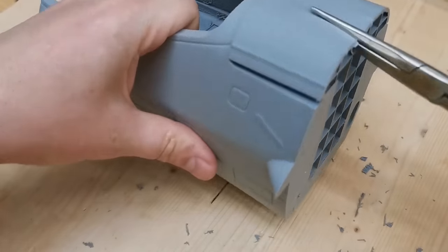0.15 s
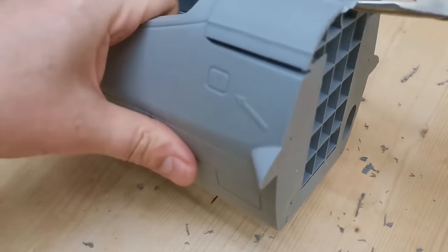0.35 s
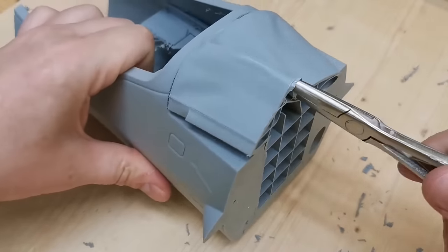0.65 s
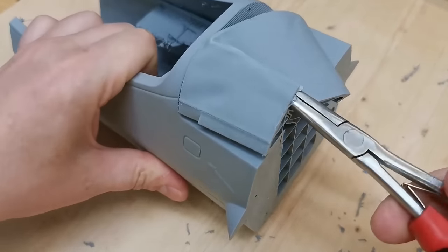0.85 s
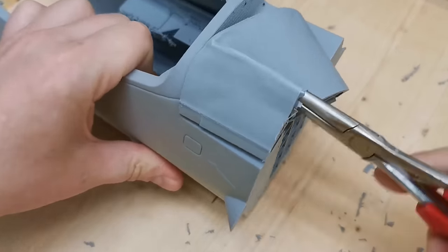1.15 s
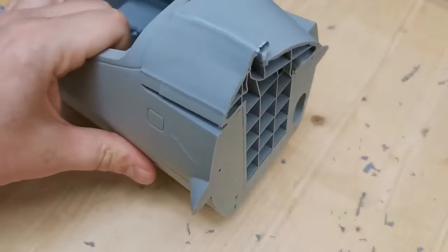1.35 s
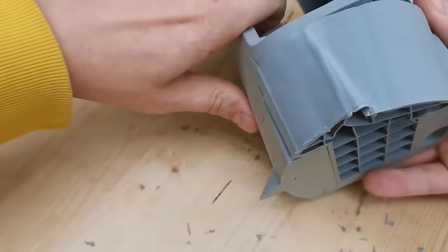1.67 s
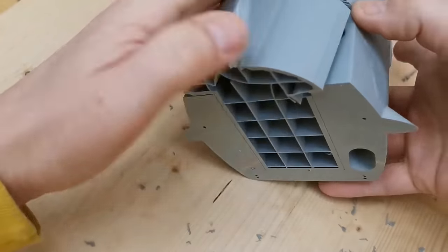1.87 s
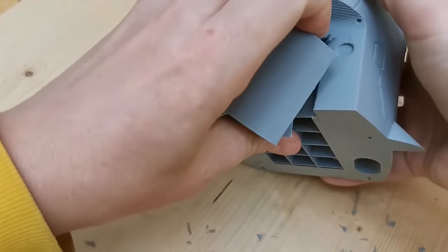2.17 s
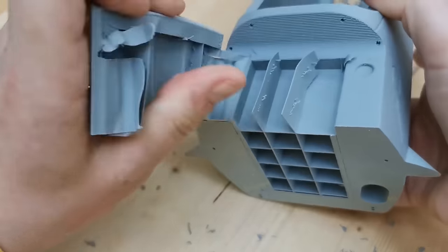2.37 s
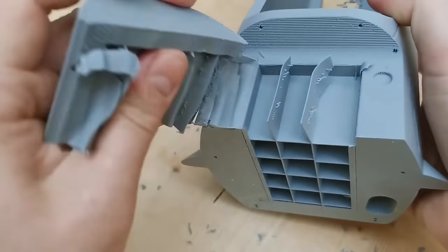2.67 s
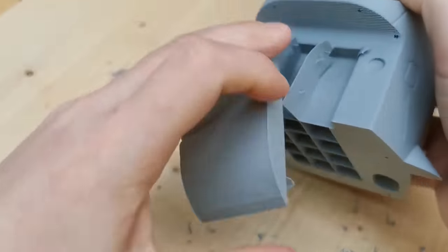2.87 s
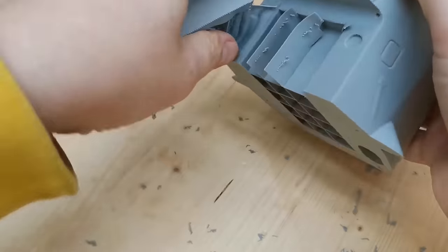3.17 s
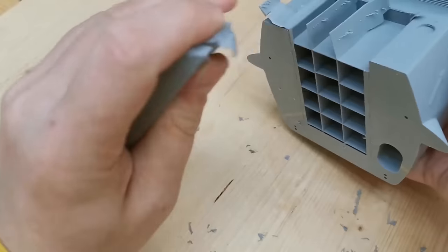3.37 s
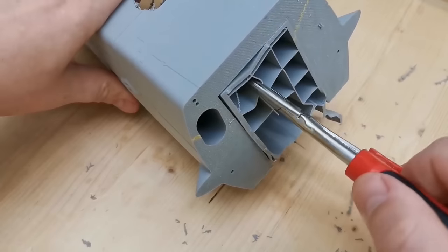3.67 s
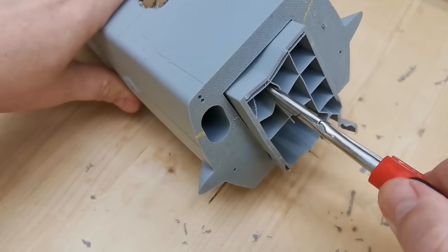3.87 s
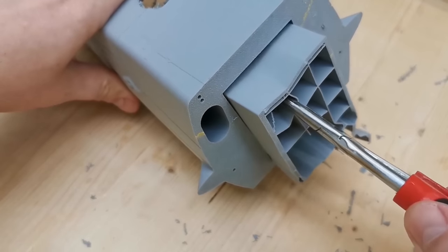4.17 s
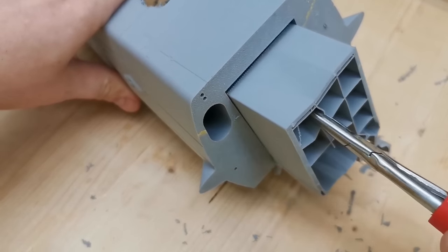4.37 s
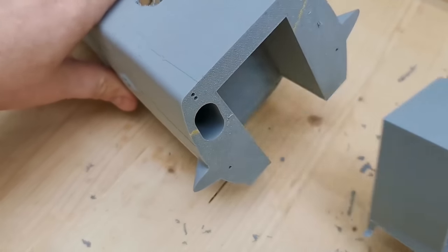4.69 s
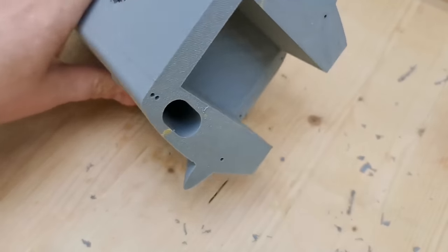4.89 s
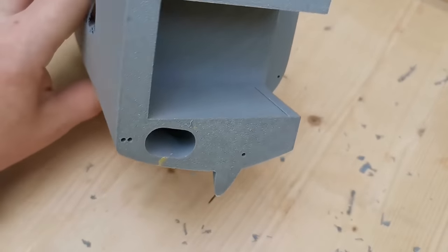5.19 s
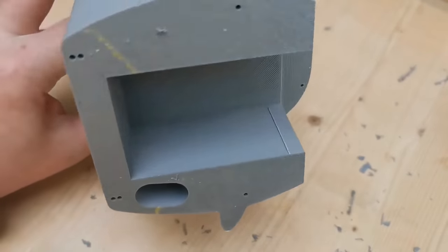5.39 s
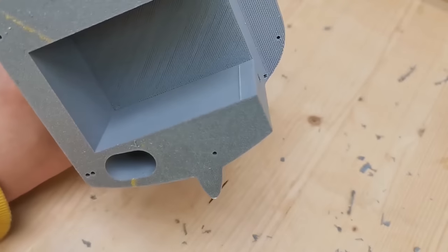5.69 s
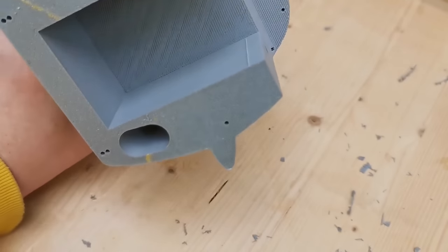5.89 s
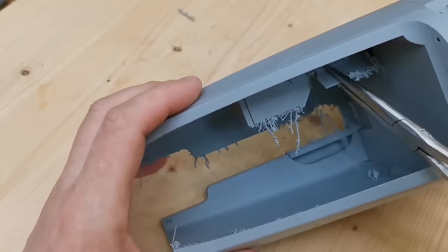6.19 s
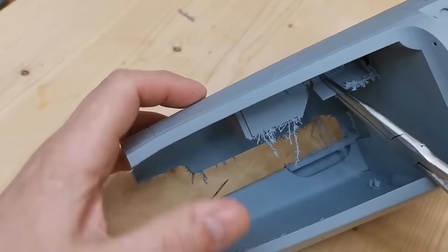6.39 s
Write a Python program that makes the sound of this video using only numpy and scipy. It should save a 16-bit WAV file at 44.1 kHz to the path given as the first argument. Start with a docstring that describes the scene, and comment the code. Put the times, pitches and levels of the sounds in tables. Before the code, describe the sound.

Close stereo microphones in a small, quiet workshop. Pliers lightly scrape hollow plastic, then thin walls snap brightly. A hard wrench makes the shell knock and chatter on the wooden bench. Scratchy peeling and scattered crackles follow. A block grates out of its pocket and pops hollowly, then a palm wipes over ridges with small ticks and the part scuffs on the bench.

```python
"""A small workshop: on a wooden bench, pliers break the support lattice out of a hollow 3D-printed plastic part.
Thin walls crack and tear as noise bursts filtered by a wall resonance; the shell knocks and chatters as damped modes.
Stick-slip noise drags a support block out of its pocket; it pops free and the pocket's air rings upward.
Then a palm wipes the ribbed shell, catches tick and the part swivels on the bench.
Decaying noise echoes it all for two close microphones, over a quiet room tone."""
import sys
import numpy as np
from scipy import signal
from scipy.fft import rfft, irfft, next_fast_len
from scipy.io import wavfile
from scipy.ndimage import uniform_filter1d

SR = 44100
rng = np.random.default_rng(int(sys.argv[2]) if len(sys.argv) > 2 else 0)


def transcribe(u):
    """Save the signal u as a 16-bit wav file named by the first command-line argument.

    u: samples, shape (n,) or (channels, n), limited to [-1, 1]; the rate is SR.
    q: integer samples, one column per channel.
    """
    v = np.clip(np.atleast_2d(u).T, -1, 1)
    q = np.round(v * 32767).astype(np.int16)
    wavfile.write(sys.argv[1], SR, q)


N = 288698
TIME = np.arange(N) / SR
BLOW_S = .01  # reference duration for the energy of a blow


def undb(db):
    """Logarithmic level: decibels to amplitude gain."""
    return 10 ** (np.asarray(db) / 20)


def unit(x):
    """Energy normalization: scale to a sum of squares of one."""
    return x / np.sqrt(np.sum(x ** 2) + 1e-18)


def freqs(size):
    """Discrete spectrum: frequencies of the bins, kept above zero."""
    return np.maximum(np.fft.rfftfreq(size, 1 / SR), 1)


def lookup(points, hz):
    """Logarithmic pitch scale: interpolate (frequency [Hz], value) points along it."""
    f, value = np.transpose(points)
    return np.interp(np.log(hz), np.log(f), value)


def colour(x, points):
    """Spectral shaping: multiply the spectrum by a gain curve."""
    size = next_fast_len(N)
    gain = undb(lookup(points, freqs(size)))
    return irfft(rfft(x, size) * gain, size)[..., :N]


def butter(x, hz, kind, order=2):
    """Butterworth filtering: low-, high- or band-pass."""
    return signal.sosfilt(signal.butter(order, hz, kind, fs=SR, output="sos"), x)


def causal(gain):
    """Minimum phase: the response with this gain that rings only after its excitation."""
    cepstrum = irfft(np.log(gain))
    half = len(cepstrum) // 2
    cepstrum[1:half] *= 2
    cepstrum[half + 1:] = 0
    return np.exp(rfft(cepstrum))


def add(track, s, sound):
    """Superposition: mix a sound in at a time."""
    i = int(s * SR)
    track[..., i:i + sound.shape[-1]] += sound[..., :N - i]


def walk(rate):
    """Random modulation: straight lines join Gaussian values drawn at this rate [1/s]."""
    knots = rng.standard_normal(4096)
    return np.interp(TIME * rate, np.arange(len(knots)), knots)


def sides(pan_db):
    """Level difference between the sides, left minus right, as two gains."""
    return undb(np.array([[pan_db], [-pan_db]]) / 2)


def pair(size, apart):
    """Partial coherence: left and right noise, as the two sides see partly different faces of the plastic."""
    shared, own = rng.standard_normal(size), rng.standard_normal((2, size))
    return (shared + apart * own) / np.hypot(1, apart)


# background spectrum: (frequency [Hz], relative spectrum level [dB])
ROOM_TONE_COLOUR = [(30, 5.5), (90, 0), (200, 1.5), (400, -7), (900, -11), (2000, -16.5), (6000, -20.5),
                    (8500, -30.5), (12000, -22), (16000, -32.5)]


def room_tone(db=-72):
    """Ambient noise: partly coherent coloured noise whose level wanders slowly."""
    shared, left, right = (unit(colour(rng.standard_normal(N), ROOM_TONE_COLOUR)) for _ in range(3))
    return (shared + 0.79 * np.array([left, right])) * np.sqrt(N) * undb(db + walk(2.3))


# workshop decay: (frequency [Hz], reverberation time for 60 dB [s])
ROOM_DECAY = [(300, 0.39), (800, 0.34), (2100, 0.33), (5500, 0.28), (14000, 0.16)]


def workshop(wet_db, delay_s=0.0011, size=22000):
    """Diffuse reverberation: the treble dies first and the bass is more alike on both sides."""
    t, hz = np.arange(size) / SR, freqs(size)
    mid, side = rfft(rng.standard_normal((2, size)))
    apart = np.minimum(0.16 + hz / 1800, 1)
    noise = (mid + np.array([[1], [-1]]) * apart * side) / np.sqrt(1 + apart ** 2)
    out = 0
    for k, (_, t60) in enumerate(ROOM_DECAY):
        # crossfaded bands, each with its own decay
        share = lookup([(f, j == k) for j, (f, _) in enumerate(ROOM_DECAY)], hz)
        out = out + irfft(noise * share, size) * np.exp(-np.log(1000) * t / t60)
    onset = np.clip(t / delay_s - 1, 0, 1)
    return unit(out * onset) * np.sqrt(2) * undb(wet_db)


def hear(x, lag_s, wet_db, size=64):
    """Arrival-time difference: a positive lag delays the left direct sound, a negative one the right."""
    delay = np.array([[max(lag_s, 0)], [max(-lag_s, 0)]]) + 8 / SR  # room for a fractional delay
    response = workshop(wet_db)
    response[:, :size] += irfft(np.exp(-2j * np.pi * freqs(size) * delay))
    return signal.fftconvolve(x, response, axes=1)[:, :N]


def swell(start_s, length_s, attack_s, release_s):
    """Exponential relaxation: pressure builds up before the start, holds and lets go."""
    age = TIME - start_s
    distance = np.maximum(-age / attack_s, (age - length_s) / release_s).clip(0)
    return np.exp(-np.minimum(distance, 20))


def strokes(rows, attack_s, release_s, sag_db_per_s):
    """Power summation: bass and treble strength of strokes; each eases off as it goes."""
    power = np.zeros((2, N))
    for s, length_s, db, bass_db in rows:
        sag_db = sag_db_per_s * np.clip(TIME - s, 0, length_s)
        force = swell(s, length_s, attack_s, release_s) * undb(db - sag_db)
        power += (undb([[bass_db], [0]]) * force) ** 2
    return np.sqrt(power)


def rub(strength, points, slips_hz, spread_db, smooth, flutter_db, low_db, high_db, apart=1.0,
        slip_s=0.002, split_hz=1500):
    """Stick-slip friction: print ridges catch and let go in uneven tiny bursts, coloured by the plastic."""
    chance, size = rng.random(N), np.minimum(rng.exponential(size=N), 5)
    slips = (chance < slips_hz / SR) * undb(spread_db * size) ** 2
    power = signal.lfilter([1], [1, -np.exp(-1 / (slip_s * SR))], slips)
    grip = np.sqrt(power / power.mean() + smooth) * undb(flutter_db * walk(55))
    low, high = strength
    low_band = ("low", low * undb(low_db), apart / 2)  # the bass is more alike on both sides
    high_band = ("high", high * undb(high_db), apart)
    out = 0
    for kind, gain, width in (low_band, high_band):
        band = butter(colour(grip * pair(N, width), points), split_hz, kind, order=4)
        out = out + unit(band) * np.sqrt(2 * N) * gain
    return out


def splinters(strength, rate_hz, gain_db, spread_db=3, decay_s=0.00045, lowest_hz=3000):
    """Poisson-like ticks under strain: strands part or a ridge catches, louder with a harder stroke."""
    chance, size = rng.random(N), np.minimum(rng.exponential(size=N), 3)
    breaks = (chance < rate_hz / SR) * undb(spread_db * size + gain_db) * strength
    fade = signal.lfilter([1], [1, -np.exp(-1 / (decay_s * SR))], breaks)
    return butter(fade * pair(N, .9), lowest_hz, "high")


# pushes round on the bench: (time [s], length [s], relative level [dB], bass re treble [dB])
SWIVEL_PUSHES = [(5.62, .1, -51.5, 10.5), (5.75, 0.33, -60.5, 14), (6.085, .1, -40, -6.5),
                 (6.26, 0.15, -52, 3.5), (6.385, 0.036, -44, -5), (6.45, 0.058, -50, 1),
                 (6.51, 0.036, -41.5, -5)]
# scuffing spectrum: (frequency [Hz], relative spectrum level [dB])
SWIVEL_SPECTRUM = [(60, -41), (170, -14), (340, -10.5), (540, -20), (1000, -3), (1450, 4.5), (1950, 5),
                   (2700, 5), (3500, -1), (6700, 4.5), (7600, -9), (12000, -6.5), (16000, -12)]


def bench_swivel():
    """Sliding friction: the part scuffs round on the bench in short pushes."""
    pushing = strokes(SWIVEL_PUSHES, attack_s=0.018, release_s=0.017, sag_db_per_s=4)
    return rub(pushing, SWIVEL_SPECTRUM, slips_hz=627, spread_db=3.5, smooth=0.66, flutter_db=3.5,
               low_db=0.4, high_db=-0.7)


# palm strokes over the ribs: (time [s], length [s], relative level [dB], bass re treble [dB])
PALM_WIPES = [(4.872, .02, -70, 8.5), (4.895, .03, -60.5, 10.5), (4.932, 0.066, -29.5, -16),
              (5.0, 0.11, -38.5, -9.5), (5.11, .05, -40, -6), (5.19, 0.13, -48.5, 2),
              (5.27, 0.061, -41, -7.5), (5.35, 0.089, -46, 0), (5.46, 0.1, -48.5, -2)]
# palm spectrum: (frequency [Hz], relative spectrum level [dB])
PALM_SPECTRUM = [(60, -33), (200, -22), (540, -22), (1000, -11), (1500, -3.5), (2300, 8), (3500, 4),
                 (5500, 9), (6700, 3.5), (7600, -11.5), (12000, -5.5), (16000, -8.5)]


def palm_wipes():
    """Skin friction: the palm wipes the ribbed shell, with small ticks where a ridge catches."""
    wiping = strokes(PALM_WIPES, attack_s=0.0038, release_s=0.013, sag_db_per_s=26)
    hand = rub(wiping, PALM_SPECTRUM, slips_hz=1080, spread_db=2.0, smooth=.6, flutter_db=3,
               low_db=1.65, high_db=-2.0)
    return hand + splinters(wiping[1], rate_hz=90, gain_db=-1, lowest_hz=6500)


# the pliers feel for a grip: (time [s], length [s], relative level [dB], bass re treble [dB])
GRIP_SCRAPES = [(0, 0.016, -38, -12.5), (.11, 0.043, -51, -10), (.215, .03, -55, -6.5),
                (.26, 0.012, -47.5, -10.5), (.32, 0.027, -41, -16), (.40, 0.06, -53, -5)]
# plier spectrum: (frequency [Hz], relative spectrum level [dB])
PLIERS_SPECTRUM = [(60, -29.5), (220, -1.5), (500, -5), (900, 2.5), (1200, -14), (1800, -3), (2500, -0.5),
                   (3600, -6), (4700, -0.5), (6000, -10.5), (12000, -9), (16000, -16.5)]


def pliers_scrape():
    """Stick-slip scraping: the pliers scrape the plastic for a grip."""
    scraping = strokes(GRIP_SCRAPES, attack_s=0.032, release_s=0.014, sag_db_per_s=29.5)
    return rub(scraping, PLIERS_SPECTRUM, slips_hz=1000, spread_db=-0.5, smooth=.5, flutter_db=6,
               low_db=-1.5, high_db=-3.0)


def strike(modes, centre_hz, focus_db, scatter_db=8.0, detune=0.0065, size=12000):
    """Modal excitation: one blow weights damped modes by focus, in dB per squared octave off a centre."""
    t = np.arange(size) / SR
    hz, db, t60 = np.transpose(modes)[:, :, None]
    weight, shift = rng.standard_normal((2, len(modes), 1))
    gain = undb(db + scatter_db * weight - focus_db * np.log2(hz / centre_hz) ** 2)
    tone = np.sin(2 * np.pi * hz * (1 + detune * shift) * t)
    ring = np.sum(gain * tone * np.exp(-np.log(1000) * t / t60), axis=0)
    ring = butter(ring, 300, "high", order=4)  # the ring carries little below 300 Hz
    return ring / np.sqrt(np.mean(ring[:int(2 * BLOW_S * SR)] ** 2))


def puff(lo_hz, hi_hz, decay_s, size=12000):
    """High modal density: quickly damped noise stands for the many modes of one band."""
    noise = rng.standard_normal(size) * np.exp(-np.arange(size) / SR / decay_s)
    return unit(butter(noise, [lo_hz, hi_hz], "band")) * np.sqrt(BLOW_S * SR)


# the shell meets the bench: (time [s], relative level [dB], relative thud level [dB],
# relative clack level [dB], centre of the modes that the contact favours [Hz])
BENCH_KNOCKS = [(.335, -48.5, -21, -3, 494), (0.535, -49, -5, -9, 657), (1.055, -51.5, -1, 1, 770),
                (1.15, -38, -9, -11, 367), (1.331, -52.5, -0.5, 5, 340), (1.375, -31.5, -13, -26, 586),
                (1.421, -29.5, -8.5, -3, 700), (1.428, -19, -22.5, -13, 720), (1.462, -23, -14.5, -16, 696),
                (1.493, -24.5, -25, -16, 690), (1.755, -37.5, -13, -21, 495), (1.797, -45, 0, -5, 337),
                (1.846, -39.5, -3, -25, 565), (2.239, -41, -4, 6.5, 899), (2.378, -36.5, -15, -19, 593),
                (2.866, -38.5, -13, -10, 567), (3.05, -37, -9, -9, 560), (3.665, -57, 10, -10, 315),
                (5.608, -33.5, -12, -7.5, 627), (6.376, -31.5, -4, -5.5, 332), (6.504, -38, 1.5, -16, 322)]
# modes of the hollow shell: (nominal frequency [Hz], relative level [dB], decay time for 60 dB [s])
SHELL_MODES = [(330.4, -1, 0.16), (456, -5.5, 0.074), (550, -5.5, 0.046), (569.5, -2.5, 0.11),
               (619, -6.5, 0.071), (676, 0, 0.04), (730, -15.5, 0.047), (835, -26, .08), (899, -12.5, .09),
               (1090, -9.5, .1), (1130, -28.5, .08), (1620, -20, .08)]


def bench_knocks(shell_db=-10.0, bench_db=-8, contact_db=-6):
    """Impact between bodies: the shell rings, the bench thuds and the contact clacks."""
    out = np.zeros(N)
    for s, db, thud_db, clack_db, centre_hz in BENCH_KNOCKS:
        ring = undb(shell_db) * strike(SHELL_MODES, centre_hz, focus_db=16.5)
        thud = undb(bench_db + thud_db) * puff(80, 340, 0.0091)
        clack = undb(contact_db + clack_db) * puff(800, 2100, .006)
        add(out, s, undb(db) * (ring + thud + clack))
    return out


def chatter(start_s=1.436, gap_s=.021, jitter_s=0.0022, level_db=-35.0, fade_db_per_s=105,
            centre_hz=630, clack_db=-17, thud_db=-24, count=8):
    """Repeated impact with energy loss: the wrenched shell bounces nearly evenly, ever weaker."""
    out = np.zeros(N)
    for k, jitter in enumerate(rng.standard_normal(count)):
        age = k * gap_s
        ring = strike(SHELL_MODES, centre_hz, focus_db=46)
        clack = undb(clack_db) * puff(800, 2100, .006)
        thud = undb(thud_db) * puff(80, 340, 0.017)
        gain = undb(level_db - fade_db_per_s * age)
        add(out, start_s + age + jitter_s * jitter, gain * (ring + clack + thud))
    return out


# two hauls drag the block out of its pocket: (time [s], effort as relative level [dB])
BLOCK_EFFORT = [(3.69, -49.5), (3.7, -75), (3.708, -49.5), (3.758, -46), (3.786, -49.5), (3.884, -39.5),
                (3.994, -44), (4.006, -42), (4.098, -48.5), (4.12, -52.5), (4.268, -40), (4.412, -43.5),
                (4.424, -40), (4.475, -41.5)]
# sliding spectrum: (frequency [Hz], relative spectrum level [dB])
BLOCK_SPECTRUM = [(60, -17), (170, -5), (320, 4), (520, -8), (780, -1.5), (1070, 2), (1250, -5),
                  (1550, -0.5), (2300, -8), (3000, -12.5), (4000, -16.5), (6500, -17), (7600, -33),
                  (16000, -30.5)]


def block_drag(brighten=0.74, stop_s=0.018):
    """Load-dependent friction: a harder pull is brighter, by extra treble dB per dB of effort."""
    s, db = np.transpose(BLOCK_EFFORT)
    effort_db = np.interp(TIME, s, db)
    treble_db = effort_db + brighten * (effort_db - db.max())
    envelope = swell(s[0], s[-1] - s[0], attack_s=0.014, release_s=stop_s)
    return rub(undb([effort_db, treble_db]) * envelope, BLOCK_SPECTRUM, slips_hz=680, spread_db=2.5,
               smooth=0.91, flutter_db=-0.74, low_db=-1.0, high_db=1.7)


# the block pops free: (time [s], relative level [dB])
BLOCK_POPS = [(4.4897, -27.5), (4.5, -32.5), (4.56, -44), (4.585, -46.5)]
# modes of the open pocket: (nominal frequency [Hz], relative level [dB], decay time for 60 dB [s])
POCKET_MODES = [(290, -9.5, 0.068), (774, -9, 0.14), (831, 6.5, 0.15), (900, -3.5, 0.17), (970, -2, 0.18),
                (1067, 11, 0.063), (1270, -6, 0.026), (1750, 5, 0.043), (2220, -0.5, 0.039),
                (2370, -9, 0.074)]


def pocket_pops(pop_db=-6.0, edge_db=-2):
    """Modal release: the emptied pocket rings while the block's edge scuffs the rim."""
    out = np.zeros(N)
    for s, db in BLOCK_POPS:
        edge = undb(edge_db) * puff(750, 1900, 0.0072)
        ring = strike(POCKET_MODES, centre_hz=900, focus_db=-2, detune=0.0193)
        add(out, s, undb(db + pop_db) * (ring + edge))
    return out


def pocket_mouth(closed_hz=747, open_hz=1020, opens_s=0.047, level_db=-41.5, decay_s=0.05, width_hz=90):
    """Cavity resonance: the leaving block stirs the air, and the pitch rises as the mouth opens."""
    pop_s = BLOCK_POPS[0][0]
    hz = np.interp(TIME, [pop_s, pop_s + opens_s], [closed_hz, open_hz])
    stirring = walk(2 * width_hz) + 1j * walk(2 * width_hz)  # spreads the tone into a narrow band
    air = np.real(stirring * np.exp(2j * np.pi * np.cumsum(hz) / SR))
    return undb(level_db) * air * swell(pop_s, 0, attack_s=0.0016, release_s=decay_s)


# pulls on the lattice: (time [s], length [s], relative level [dB], bass re treble [dB])
LATTICE_PULLS = [(1.02, 0.064, -54.5, 0.5), (1.18, .06, -41.5, -11), (1.385, 0.016, -47.5, -6),
                 (1.44, 0.156, -73, -20), (1.675, 0.054, -52.5, -24), (1.755, 0.053, -41.5, -6.5),
                 (1.82, 0.038, -44, -8.5), (1.95, 0.036, -47.5, -12), (2.09, 0.08, -41.5, -12.5),
                 (2.29, 0.051, -46, -21.5), (2.375, 0.017, -43.5, -29), (2.455, 0.02, -49.5, -11),
                 (2.52, 0.018, -51, -30), (2.715, .01, -58.5, -7.5), (2.845, 0.062, -43, -20),
                 (2.945, 0.029, -45, -10.5), (2.985, 0.045, -44, -8), (3.055, 0.038, -41, -7),
                 (3.125, 0.016, -45.5, -24), (3.175, 0.058, -48.5, -10.5), (3.29, .05, -47, -10),
                 (3.42, 0.065, -57, -25)]
# peeling spectrum: (frequency [Hz], relative spectrum level [dB])
PEEL_SPECTRUM = [(60, -15.5), (200, -9.5), (320, 10.5), (440, -1), (560, 9), (690, 4.5), (850, 1),
                 (1250, -7.5), (2300, -3.5), (4600, 1), (8500, -1.5), (13500, 0.5), (16000, -7)]


def lattice_peel():
    """Progressive failure: pulls peel the lattice off the shell while fine strands part."""
    pulling = strokes(LATTICE_PULLS, attack_s=0.014, release_s=0.0049, sag_db_per_s=25)
    peel = rub(pulling, PEEL_SPECTRUM, slips_hz=530, spread_db=2.5, smooth=.1, flutter_db=3,
               low_db=-6.0, high_db=0.0)
    return peel + splinters(pulling[1], rate_hz=69, gain_db=1.5)


# borders of the body, middle, treble and top bands of a fracture: (frequency [Hz])
BAND_BORDERS_HZ = [400, 2000, 6000, 10000, 16000]


def crack(burst, levels_db, ring_hz, run_s, wall_s=0.002, ring_db=7, ring_width=0.072, rise_s=0.000097,
          bass_hz=430):
    """Brittle fracture: a burst of tiny breaks runs through a thin wall, which rings for a few cycles."""
    size = len(burst)
    t, hz = np.arange(size) / SR, freqs(size)
    fade = (1 - np.exp(-t / rise_s)) * np.exp(-t / (wall_s + run_s))
    prominence_db = ring_db - 3 * np.log2(ring_hz / 6000)  # thick walls ring lower and more clearly
    ring = 1 + undb(prominence_db) / (1 + ((hz - ring_hz) / (ring_width * ring_hz)) ** 2)
    radiation = 0.11 + hz ** 2 / (hz ** 2 + bass_hz ** 2)  # small walls radiate little bass
    spectrum = rfft(burst * fade) * causal(ring * radiation)
    bands = [(hz >= lo) & (hz < hi) for lo, hi in zip(BAND_BORDERS_HZ, BAND_BORDERS_HZ[1:])]
    for _ in range(2):  # share the energy out between the bands; the second pass refines it
        energy = np.array([2 * np.sum(abs(spectrum[band]) ** 2) / size for band in bands])
        gain_db = levels_db - 10 * np.log10(energy / (BLOW_S * SR))
        steps_db = gain_db[np.searchsorted(BAND_BORDERS_HZ[1:-1], hz)]
        spectrum = spectrum * causal(undb(uniform_filter1d(steps_db, size=64)))
    return irfft(spectrum)


def cracks(rows, gain_db, run_s, top_db, apart, spike, top_per_db=0.08, spike_s=0.001, size=2048):
    """Impulsive onset: a sharp spike leads each break; brighter breaks put more treble in the very top."""
    out = np.zeros((2, N))
    first_break = 1 + spike * np.exp(-np.arange(size) / SR / spike_s)
    for s, db, body_db, bright_db, ring_hz, pan_db in rows:
        lean_db = top_db + top_per_db * bright_db + 4.9 * np.log2(max(ring_hz, 6000) / 6000)
        lean = undb(lean_db)  # top band against treble band
        treble_db = bright_db + 20 * np.log10(np.array([1, lean]) / np.hypot(1, lean))
        levels_db = gain_db + db + np.array([body_db, 0, *treble_db])
        bursts = pair(size=size, apart=apart) * first_break
        snap = np.array([crack(burst, levels_db, ring_hz, run_s) for burst in bursts])
        add(out, s, snap * sides(pan_db))
    return out


# nails and tool catch on the ribs: (time [s], relative level at 2-6 kHz [dB], body re middle [dB],
# brightness re middle [dB], ring [Hz], left minus right [dB])
RIB_TICKS = [(4.9344, -36.5, -17, 2.5, 2580, -7), (5.06, -33, -26, -8, 5860, -5),
             (5.3794, -40.5, -19, 3.5, 6600, -5.5), (5.4283, -38.5, -17, -1, 6400, -5.5),
             (5.6526, -38.5, -2.5, -6.5, 2370, -6.5), (5.7378, -36.5, -11, -1, 6680, -4),
             (5.7767, -41.5, -15, -4, 6800, -3), (5.8843, -35.5, -17, -0.5, 6500, -6),
             (5.914, -42, -7.5, -2, 6370, -6), (5.967, -27, -17, -11, 2930, -5),
             (6.0092, -36.5, -14, -8, 2900, -1), (6.028, -36, -2.5, -4, 2020, -5),
             (6.0508, -38, -5, -2, 1980, -3), (6.078, -31, -19, -3.5, 4860, -3.5),
             (6.2997, -41, -9, -0.5, 6070, -5)]


def rib_ticks():
    """Impulsive contact: nails and tool catch on the ribs as the part is turned."""
    return cracks(RIB_TICKS, gain_db=-1.8, run_s=0.003, top_db=-0.5, apart=0.99, spike=0.4)


# splits along a printed seam: (time [s], relative level at 2-6 kHz [dB], body re middle [dB],
# brightness re middle [dB], ring of the wall [Hz], left minus right [dB])
SEAM_TEARS = [(0.331, -40, -18.5, -12, 2380, -15), (0.9762, -31, -8.5, 2.5, 2080, 1.5),
              (1.1403, -43.5, -14, -2, 4910, -5), (1.1975, -41, -13, 1, 10590, -4.5),
              (1.4275, -42.5, 4, -8, 2300, -9), (1.4405, -41.5, 1, -13, 4050, -6),
              (1.5891, -44, -11, -4, 3850, 2), (1.6129, -39.5, -20, -4, 3960, -3),
              (1.6503, -41.5, -20, -4.5, 3880, -3.5), (2.264, -39.5, -2.5, -4, 4950, 3),
              (2.3864, -49.5, -2, 11.5, 9430, -4.5), (2.87, -47.5, 0.5, 13, 11150, -4),
              (2.9518, -43, -11, -14, 2970, -8), (3.015, -44, -13, 7, 9520, -5),
              (3.0945, -47, -11, 5, 12490, -8), (3.3389, -38.5, -17, 4.5, 11760, -8),
              (3.476, -58, -26, 16.5, 9950, -2.5), (3.5076, -47, -11.5, 0.5, 2470, -0.5),
              (3.5555, -47, -8.5, 6.5, 6300, -1), (3.7376, -39, -6, -7.5, 2110, -4.5),
              (3.9974, -40, -1, -4, 6030, -7.5), (4.0386, -36.5, -3, -5, 5950, -0.5),
              (4.4936, -32, 7, -9.5, 1920, -4.5)]


def seam_tears():
    """Running fracture: a split along a printed seam lasts longer, with a softer first spike."""
    return cracks(SEAM_TEARS, gain_db=-2.7, run_s=0.0013, top_db=0.5, apart=0.91, spike=.6)


# walls break clean through: (time [s], relative level at 2-6 kHz [dB], body re middle [dB],
# brightness re middle [dB], ring of the wall [Hz], left minus right [dB])
WALL_SNAPS = [(0.4799, -19, -22.5, -8.5, 3000, -1.5), (0.537, -39, -10, 13, 12450, 2.5),
              (0.5406, -38, -28, 2, 5380, -8), (0.5516, -42.5, -11, 11, 11020, 1),
              (0.5674, -44, -21, 13.5, 10470, -0.5), (0.6078, -50, -28.5, 9, 12450, -1),
              (0.674, -40, -26, 7.5, 8200, 5), (0.6841, -32, -23.5, 1.5, 4750, 0),
              (0.7298, -22, -15, 2, 4500, -2.5), (0.7957, -37.5, -12, 4.5, 12360, 0),
              (0.8364, -29, -11.5, 4, 4800, 0), (0.9231, -49.5, -12, 20, 10100, 0),
              (1.1033, -37.5, -23, 8.5, 7140, -1), (1.2396, -39.5, -23, 2, 5990, 0),
              (1.3765, -34.5, -16, -11, 3700, -1), (1.4139, -40.5, -17, 1, 3750, 14),
              (1.4202, -27, -12, -10.5, 2390, -8.5), (1.4683, -36, -5, -9, 2670, -9),
              (1.4778, -32.5, -19, -10.5, 2370, -5.5), (1.5183, -31, -17, -3.5, 3950, 0),
              (1.534, -48, -12, -1, 4050, 0), (1.562, -42.5, -13, -6.5, 3950, -1),
              (1.8091, -38, -20, 5, 4520, 1), (1.9817, -53.5, -26, 8.5, 10620, -3.5),
              (2.0626, -46, -17, 7.5, 5030, -1), (2.0974, -40, -20, 9.5, 6030, 7),
              (2.1035, -29.5, -20, 1.5, 4700, -2), (2.1685, -41.5, -21, 2, 5100, -2),
              (2.2236, -29.5, -18.5, 2, 5940, 2), (2.2335, -36, -22, 0, 4520, 1),
              (2.2398, -23.5, -16, 0.5, 9000, -2), (2.244, -35.5, -26, -5, 4470, -10),
              (2.523, -44, -33, 10.5, 6060, -4.5), (2.551, -64, -29.5, 27, 12400, -1),
              (2.6525, -51.5, -17, 7.5, 10290, -3), (2.7673, -57, -34, 5, 4570, -2),
              (2.88, -45, -14, 11.5, 11150, -2.5), (2.9974, -41, -10, -4, 4900, -3),
              (3.222, -36, -13, -0.5, 6400, -4.5), (3.2714, -38, -16, 5, 6300, -7),
              (3.2834, -36.5, -14, 8, 11900, 2.5), (3.294, -39.5, -18, 9.5, 6300, -3),
              (3.305, -54, -15, 1, 6240, -4), (3.3266, -53, -17, 18, 12960, 0),
              (3.3334, -34.5, -31, 5.5, 5800, 0.5), (3.4417, -47.5, -17, 7.5, 5140, -1.5),
              (3.5615, -38, -11, -12, 2060, -1.5), (3.684, -26.5, -20.5, -6, 4310, -2)]


def wall_snaps():
    """Sudden fracture: thin walls break clean through, short and led by the sharpest spike."""
    return cracks(WALL_SNAPS, gain_db=-0.87, run_s=0.00067, top_db=1.0, apart=1.0, spike=0.89)


def scene():
    """Superposition in two directions: work in front; once the block is out, the part is turned to the right."""
    right = bench_swivel() * sides(-2.4) + palm_wipes() * sides(-4.0) + rib_ticks()
    front = (pliers_scrape() + lattice_peel()) * sides(-.5)
    front = front + (bench_knocks() + chatter() + pocket_pops()) * sides(-.8)
    front = front + block_drag() * sides(-2.8) + pocket_mouth() * sides(-12)
    front = front + seam_tears() + wall_snaps()
    heard_front = hear(front, lag_s=-0.000026, wet_db=-9.5)
    heard_right = hear(right, lag_s=0.000267, wet_db=-11)
    return room_tone() + heard_right + heard_front


def record(dry, ceiling=.9, top_hz=15900):
    """Soft saturation and band limiting: the hardest peaks are rounded and the top is cut."""
    rounded = ceiling * np.tanh(dry / ceiling)
    return signal.sosfilt(signal.ellip(10, .2, 70, top_hz, fs=SR, output="sos"), rounded)


dry = scene()
out = record(dry)
transcribe(out)
```